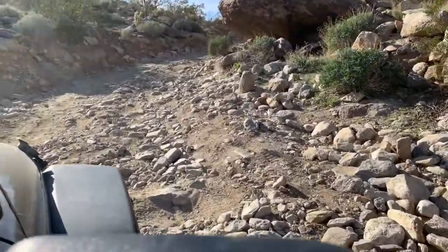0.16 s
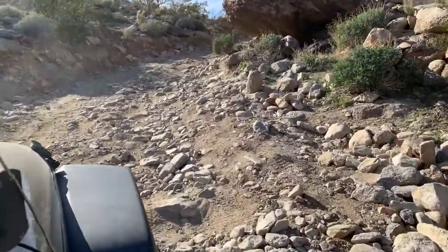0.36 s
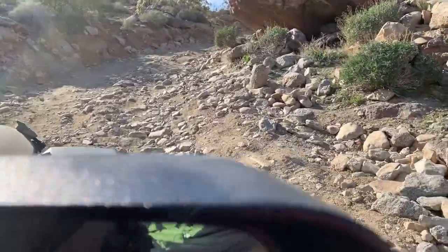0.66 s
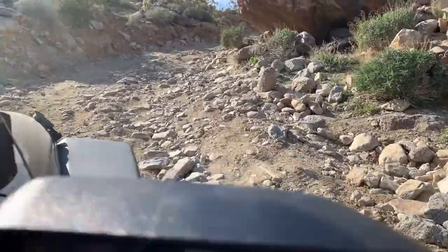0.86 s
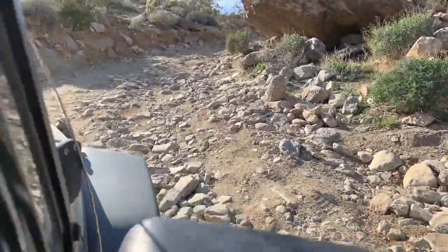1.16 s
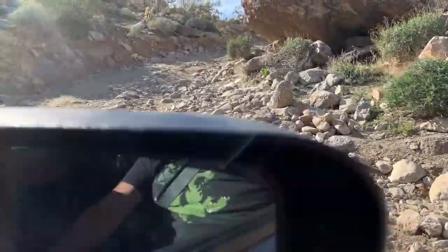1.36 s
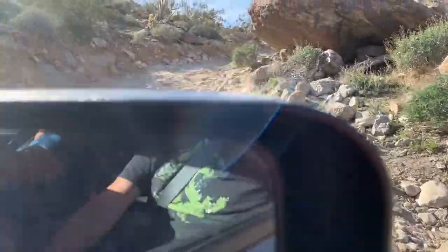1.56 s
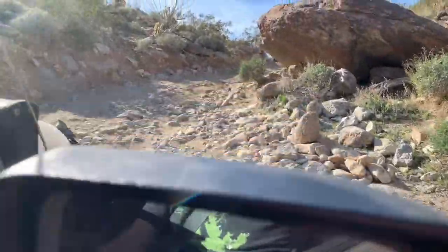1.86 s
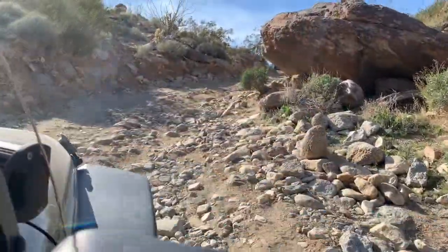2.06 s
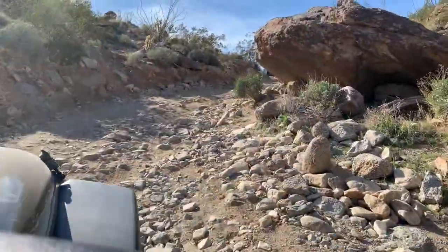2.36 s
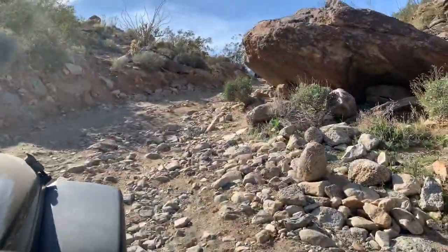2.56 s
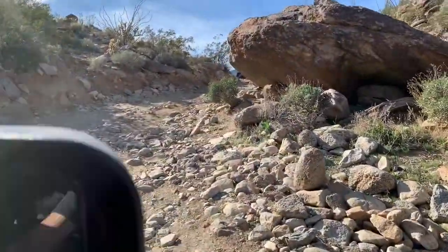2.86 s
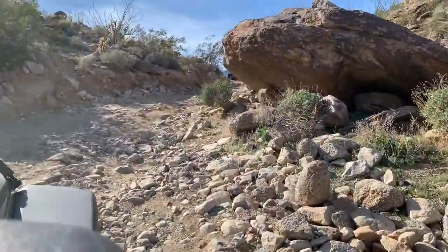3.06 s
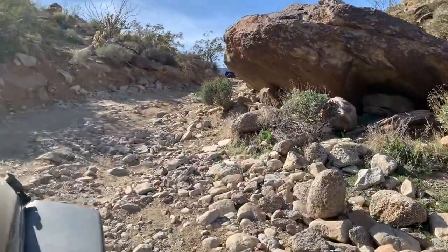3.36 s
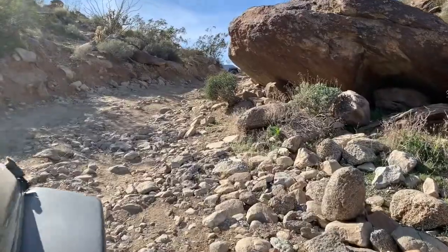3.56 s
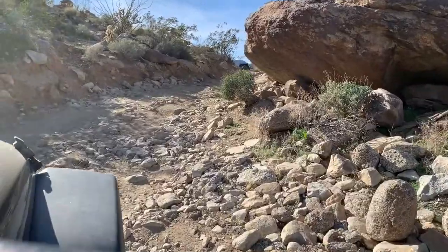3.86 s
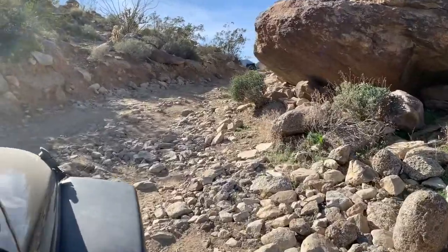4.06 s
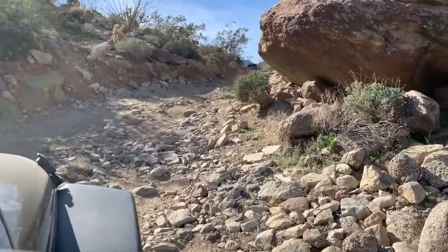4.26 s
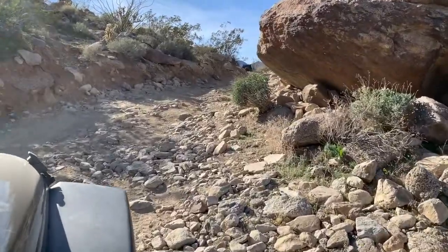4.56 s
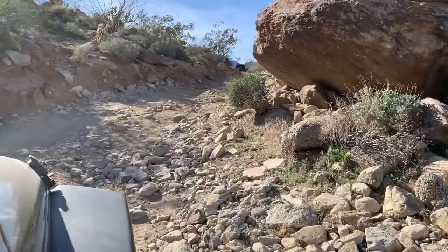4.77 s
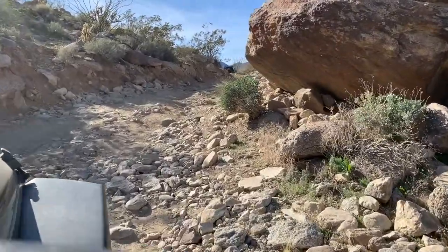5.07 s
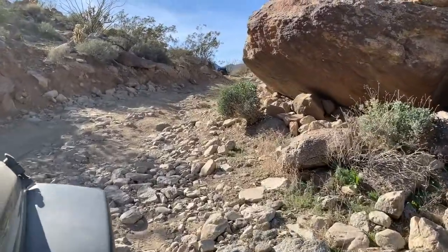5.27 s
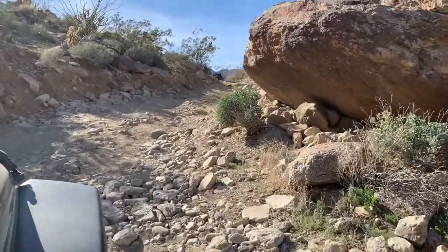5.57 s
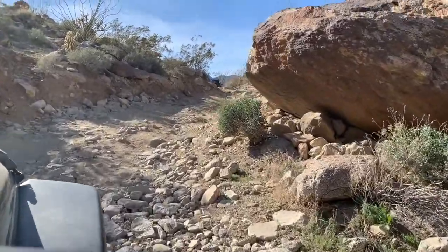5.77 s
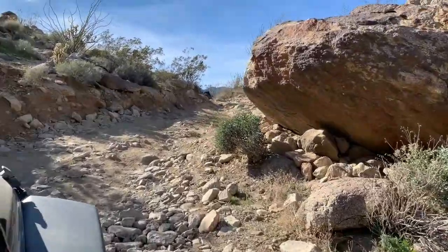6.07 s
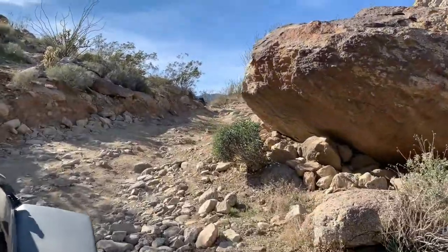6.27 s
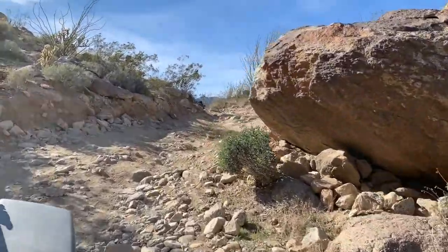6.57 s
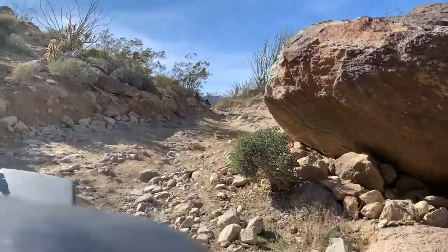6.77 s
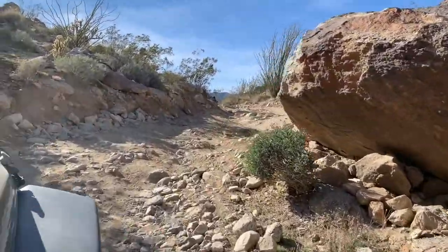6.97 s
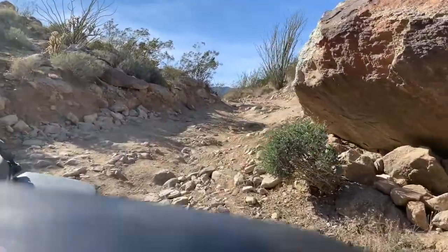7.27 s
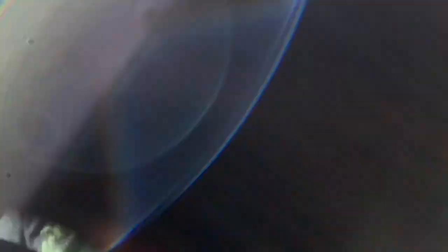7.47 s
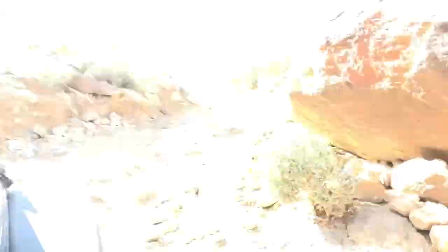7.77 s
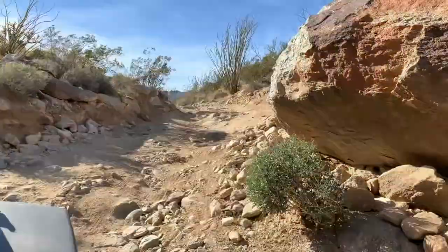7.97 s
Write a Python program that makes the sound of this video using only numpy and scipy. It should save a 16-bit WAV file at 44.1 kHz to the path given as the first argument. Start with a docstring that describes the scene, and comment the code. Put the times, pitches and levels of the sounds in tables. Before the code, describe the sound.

A four-wheel-drive crawls up a rocky trail, engine droning low, gravel crunching and stones knocking, keys jingling, then one hard bang near the end.

```python
"""Rocky trail from an off-road cab

A four-wheel-drive crawls up a rocky desert trail, heard from the cab by the open window.
Tones at multiples of the firing rate drone and sag with the throttle; banded noise makes rumble and tyre roar.
Random pebbles and timed stones ring resonances; jolts thump the cab, trim rubs and cracks, keys jingle.
Near the end a hard bump close to the microphone makes the limiter duck."""
import sys
import numpy as np
from scipy import signal
from scipy.fft import rfft, irfft, next_fast_len
from scipy.io import wavfile
from scipy.ndimage import uniform_filter1d

SR = 44100
rng = np.random.default_rng(int(sys.argv[2]) if len(sys.argv) > 2 else 0)


def to_wav(sig):
    """Store sig (one row per channel, or 1-D mono) as 16-bit WAV at the path in sys.argv[1].

    Samples outside -1..1 are clipped; the rate is SR.
    """
    pcm = np.clip(np.atleast_2d(sig), -1, 1) * 32767
    pcm = np.round(pcm).astype(np.int16)
    wavfile.write(sys.argv[1], SR, pcm.T)  # frames by channels


N = 358522
TIME = np.arange(N) / SR

# wheel-well resonances: (frequency [Hz], level [dB])
WELL_MODES = [(545, -5.5), (690, -3), (810, -7.5), (931, -6), (1130, -10.5), (1450, -1.5), (1700, -5.5),
              (2050, -2), (2840, -19), (3490, -44)]


def from_db(db):
    """Decibels to gain."""
    return 10 ** (np.asarray(db) / 20)


def rms_one(x):
    """Scale to rms 1."""
    return x / np.sqrt(np.mean(x ** 2) + 1e-20)


def peak_one(x):
    """Scale to peak 1."""
    return x / (np.abs(x).max() + 1e-12)


def in_time(rows):
    """Each column of a curve at every sample."""
    time_s, *columns = np.transpose(rows)
    return [np.interp(TIME, time_s, column) for column in columns]


def at_hz(points, hz):
    """Each column of a spectrum at the given frequencies, interpolated over log frequency."""
    known_hz, *columns = np.transpose(points)
    return [np.interp(np.log(hz + 1e-6), np.log(known_hz), column) for column in columns]


def cut(x, hz, kind, order=2):
    """Butterworth filter."""
    sos = signal.butter(order, np.clip(hz, 10, .45 * SR), kind, fs=SR, output="sos")
    return signal.sosfilt(sos, x + 1e-18)


def drift(rate_hz):
    """Slow random wander of spread 1: two-pole low-passed noise, computed every 40 samples."""
    step = 40
    r = np.exp(-2 * np.pi * rate_hz * step / SR)
    noise = rng.standard_normal(N // step + 2002)
    slow = signal.lfilter([1], [1, -2 * r, r * r], noise)[2000:]   # drop the settling
    return np.interp(np.arange(N) / step, np.arange(len(slow)), rms_one(slow))


def ring(force, hz, t60_s):
    """Two-pole resonator: a unit click sets a decaying sine of height 1 ringing."""
    r = from_db(-60 / (t60_s * SR))
    w = 2 * np.pi * hz / SR
    return signal.lfilter([0, np.sin(w)], [1, -2 * r * np.cos(w), r * r], force + 1e-18)


def resonate(x, hz, width_hz):
    """A resonance with gain 1 on top."""
    r = np.exp(-np.pi * width_hz / SR)
    zeros = (1 - r * r) / 2 * np.array([1, 0, -1])
    poles = [1, -2 * r * np.cos(2 * np.pi * hz / SR), r * r]
    return signal.lfilter(zeros, poles, x + 1e-18)


def burst(decay_s):
    """A contact: a dying shower of uneven micro-impacts, a quarter second long."""
    t = TIME[:SR // 4]
    impacts = rng.standard_normal(len(t)) * rng.exponential(1, len(t))
    return impacts * np.exp(-t / max(decay_s, 1e-4))


def add(track, time_s, sound):
    """Mix a sound in at a time."""
    start = max(round(time_s * SR), 0)
    track[start:start + len(sound)] += sound[:N - start]


def ports(shared, diffuse=None):
    """Two microphone ports: phase differs by frequency; diffuse sound also makes their content differ."""
    # microphone ports: (frequency [Hz], likeness [0-1], left lead [rad])
    port_curve = [(49.7, 0.88, 0.71), (356, 0.96, -0.12), (427, 1, 1.25), (596, 1, -1.73), (1170, 0.68, -1),
                  (1600, 0.22, 0), (3470, 0.22, 1.5), (6400, 0.26, 1), (7365, 1, 1.5), (12620, 1, 8),
                  (13900, 0.7, 10), (15800, 0.8, 7)]
    size = next_fast_len(N + SR // 10)
    alike, lead_rad = at_hz(port_curve, np.arange(size // 2 + 1) * SR / size)
    both = rfft(shared, size)
    if diffuse is not None:
        alike = np.clip(alike, 0, 1)
        sides = np.array([[1], [-1]])
        both = np.sqrt((1 + alike) / 2) * both + sides * np.sqrt((1 - alike) / 2) * rfft(diffuse, size)
    lag = np.exp(-1j * lead_rad * np.array([[0], [1]]))   # right port only
    return irfft(both * lag, size)[:, :N]


def from_the_right(x, lag_s=0.000437):
    """Blows on the door side reach the left port later."""
    left, right = x
    return np.array([np.interp(TIME - lag_s, TIME, left), right])


def banded_noise(spectrum, patchy_db, flicker_hz):
    """Half-octave bands of stereo noise that flicker partly together; rms 1."""
    out = 0
    together = drift(flicker_hz)
    edges_hz = 20 * 2 ** np.arange(0, 10.1, .5)
    white = rng.standard_normal((2, 2, N))
    for k, (low, high) in enumerate(zip(edges_hz, edges_hz[1:])):
        if high > spectrum[0][0] and low < spectrum[-1][0]:
            flicker_db = patchy_db * (together + drift(flicker_hz))
            level_db = at_hz(spectrum, np.sqrt(low * high))[0] + flicker_db
            out = out + from_db(level_db) * cut(white[k % 2], [low, high], "band")
    return rms_one(ports(*out))


def climbs():
    """A wheel climbs a rock: the engine labours, the tyre bites; bell-shaped drone and gravel gains in dB."""
    # (middle [s], half length to 1/e [s], drone gain [dB], gravel gain [dB])
    climb_events = [(0.82, 0.27, 0, 2.5), (1.333, 0.044, 4, 1), (2.258, 0.083, 0.5, 2.5),
                    (2.546, 0.079, -1, 2.5), (3.415, 0.15, 8.5, 0), (6.794, 0.092, 5.5, 4.5),
                    (8.054, 0.18, 4, 6.5)]
    gains_db = 0
    for middle_s, half_s, drone_db, gravel_db in climb_events:
        bell = np.exp(-((TIME - middle_s) / half_s) ** 2)
        gains_db = gains_db + np.outer([drone_db, gravel_db], bell)
    return gains_db


def hiss(level_db=-62.0):
    """Steady high band of noise."""
    noise = cut(rng.standard_normal(N), [7000, 15000], "band")
    return from_db(level_db) * ports(rms_one(noise))


def keys(reach_hz=600, tick_s=0.01, t60_s=0.065, rattle_db=-12, rattle_s=0.049, ring_db=2.5, tick_db=5):
    """Each touch is a short rattle that rings a different mix of keys, most strongly near its own pitch."""
    # touches: (time [s], level [dB], brightest pitch [Hz])
    clinks = [(0.071, -47, 11050), (0.577, -44, 11500), (0.785, -37.5, 7482), (0.8, -31.5, 12800),
              (0.819, -37, 9150), (0.945, -31, 7440), (0.948, -30, 11900), (1.223, -36, 12300),
              (1.495, -36.5, 8200), (2.967, -40, 12000), (3.004, -34, 12200), (3.124, -35.5, 12100),
              (3.171, -42, 11000), (3.875, -37, 10000), (3.935, -39, 8150), (4.021, -28.5, 11100),
              (4.2437, -37.5, 11600), (4.295, -36.5, 12600), (4.5516, -32.5, 11800)]
    # key resonances: (frequency [Hz], level [dB])
    key_modes = [(7482, -1), (8999, -7), (10211, -5), (11050, 0), (11917, -5), (12600, -5), (13400, -5),
                 (15738, -8)]
    strength_spread_db, pitch_spread_hz, damping_spread_octaves = 3, 11.5, 0.41
    out = np.zeros(N)
    for time_s, level_db, bright_hz in clinks:
        force = burst(tick_s) + from_db(rattle_db) * burst(rattle_s)
        tone = 0
        for hz, mode_db in key_modes:
            strength = from_db(mode_db + rng.normal(0, strength_spread_db))
            strength = strength / np.hypot(1, (hz - bright_hz) / reach_hz)
            key_hz = hz + rng.normal(0, pitch_spread_hz)
            key_t60_s = t60_s * 2 ** rng.normal(0, damping_spread_octaves)
            tone = tone + strength * peak_one(ring(force, key_hz, key_t60_s))
        tick = peak_one(cut(force, 6400, "high"))
        add(out, time_s, from_db(level_db) * (from_db(ring_db) * peak_one(tone) + from_db(tick_db) * tick))
    return out


def rubs(width_hz=170, muffle_hz=1900):
    """Trim slips as the body twists, in quick showers that ring one hollow resonance."""
    # (time [s], peak [dB], pitch [Hz], decay [s])
    rub_events = [(2.494, -18, 437, 0.0061), (2.512, -19, 377, 0.018), (4.301, -36, 1494, 0.12),
                  (7.346, -12.5, 388, 0.023), (7.351, -16, 675, 0.015), (7.374, -12, 625, 0.006),
                  (7.507, -19, 850, 0.0056), (7.516, -19.5, 627, 0.0057), (7.593, -20.5, 630, 0.012),
                  (7.612, -18, 674, 0.01), (7.63, -28, 693, 0.005), (7.724, -36.5, 2480, 0.017)]
    out = np.zeros(N)
    for time_s, peak_db, hz, decay_s in rub_events:
        slip = cut(burst(decay_s), muffle_hz, "low")
        hollow = resonate(resonate(slip, hz, width_hz), hz, width_hz)
        add(out, time_s, from_db(peak_db) * peak_one(hollow))
    return out


def cracks(crack_hz=4000, trim_ring_db=19.5):
    """Hard contacts give a short bright crack and ring the plastic trim near the microphone."""
    # (time [s], peak [dB], decay [s])
    crack_events = [(3.3747, -23, 0.0019), (3.591, -22, 0.0038), (7.3606, -1, 0.002), (7.372, -14, 0.0064)]
    # trim resonances: (frequency [Hz], width [Hz], level [dB])
    trim_modes = [(1490, 300, 0), (2700, 260, 5), (3680, 300, 7.5), (5500, 600, 1.5)]
    out = np.zeros(N)
    for time_s, peak_db, decay_s in crack_events:
        force = burst(decay_s)
        trim = sum(from_db(db) * resonate(force, hz, width_hz) for hz, width_hz, db in trim_modes)
        crack = cut(force, [400, crack_hz], "band", order=1)
        add(out, time_s, from_db(peak_db) * peak_one(crack + from_db(trim_ring_db) * trim))
    return out


def jolts(bending_s_root_hz=0.1077, mass_hz=220, front_hz=1500):
    """Blows send a bending wave through the cab and ring its panels; low notes lag, so the thump falls."""
    # blows through suspension and cab: (time [s], peak [dB], contact softness as cut-off [Hz])
    jolt_events = [(.347, -20, 258), (0.388, -18.5, 350), (0.41, -16, 220), (0.493, -17, 145),
                   (2.513, -14, 400), (7.3607, 9.5, 850), (7.694, -8.5, 86), (7.728, -11.5, 115)]
    # cab panels: (frequency [Hz], width [Hz], level [dB])
    cab_modes = [(63, 9, 0), (109, 33, 1.5), (210, 65, -6), (370, 32, -5), (680, 75, -2), (1000, 140, 9.5)]
    out, size = np.zeros(N), SR // 4
    wave = cut(signal.unit_impulse(size), mass_hz, "low", order=1)
    panels = wave + sum(from_db(db) * resonate(wave, hz, width_hz) for hz, width_hz, db in cab_modes)
    hz = np.maximum(np.arange(size // 2 + 1) * SR / size, 20)
    delay_s = bending_s_root_hz * np.maximum(hz ** -.5 - front_hz ** -.5, 0)
    phase_rad = 2 * np.pi * np.cumsum(delay_s) * SR / size   # integral of group delay
    thump = irfft(rfft(panels) * np.exp(-1j * phase_rad), size)
    fade = np.hanning(2 * size)[size:]
    for time_s, peak_db, soft_hz in jolt_events:
        add(out, time_s, from_db(peak_db) * peak_one(fade * cut(thump, [55, soft_hz], "band")))
    return out


def scrapes(edge_ratio=1.1):
    """A small stone snaps or skids on rock: a shower of micro-impacts in a broad band around its pitch."""
    # (time [s], level [dB], pitch [Hz], decay [s])
    scrape_events = [(0.808, -27, 2240, 0.0098), (0.943, -27.5, 2420, 0.0032), (1.837, -32, 3570, 0.033),
                     (2.51, -25, 2440, 0.009), (2.623, -31.5, 2240, 0.023), (2.914, -29, 1550, 0.0017),
                     (2.962, -34, 5000, 0.011), (3.374, -24, 2550, 0.003), (3.769, -22.5, 1500, 0.0024),
                     (3.871, -33, 4840, 0.019), (4.236, -34, 1300, 0.003), (4.238, -28.5, 2090, 0.007),
                     (4.274, -34, 2240, 0.02), (6.377, -32, 1420, 0.0022), (7.352, -20, 2820, 0.012),
                     (8.013, -31.5, 1380, 0.0033)]
    out = np.zeros(N)
    for time_s, level_db, hz, decay_s in scrape_events:
        shower = cut(burst(decay_s), [hz / edge_ratio, hz * edge_ratio], "band", order=1)
        add(out, time_s, from_db(level_db) * peak_one(cut(shower, 2 * hz, "low")))
    return out


def stones(knock_db=4.0, chip_db=-1.0, chip_hz=2400, tail_db=-24, tail_s=0.11, crumble_s=0.0036,
           reach_octaves=0.59, well_t60_s=0.032):
    """A stone shifts under a tyre: a crumbling knock in the wheel well and a bright chip of rock on rock."""
    # larger stones: (time [s], level [dB], relative treble [dB], pitch [Hz])
    stone_events = [(0.077, -27, -32, 706), (0.107, -31.5, -22, 706), (0.242, -33.5, -23, 1000),
                    (0.295, -30, -22, 890), (0.809, -26, -3, 690), (0.905, -28.5, -24, 745),
                    (1.312, -25.5, -6, 670), (1.763, -26.5, -21, 820), (2.083, -26, -11, 891),
                    (2.136, -29.5, -21, 830), (2.513, -22, -25, 930), (2.994, -26, -1, 675),
                    (3.374, -28.5, 5, 600), (3.485, -30.5, -9, 651), (3.592, -18.5, 1.5, 760),
                    (5.834, -34, -16, 730), (6.38, -29, -35, 1040)]
    out = np.zeros(N)
    for time_s, level_db, treble_db, pitch_hz in stone_events:
        force = burst(crumble_s) + from_db(tail_db) * burst(tail_s)
        snap = force + 6 * signal.unit_impulse(len(force))   # the stone lets go all at once
        knock = 0
        for hz, mode_db in WELL_MODES:
            nearness = 1 / (1 + (np.log2(hz / pitch_hz) / reach_octaves) ** 2)   # its size picks the modes
            gain = from_db(mode_db) * nearness * rng.choice([-1, 1])
            knock = knock + gain * ring(snap, hz, well_t60_s)
        chip = cut(cut(force, chip_hz, "high"), 13000, "low", order=1)
        blow = from_db(knock_db) * peak_one(knock) + from_db(chip_db + treble_db) * peak_one(chip)
        add(out, time_s, from_db(level_db) * blow)
    return out


def body_rumble(level_db):
    """Low banded noise as the body sways and shakes."""
    # (frequency [Hz], density [dB per Hz])
    rumble_spectrum = [(22, -18), (35, -4), (48, -2), (75, 4), (100, -10), (150, -12), (220, -12),
                       (400, -40)]
    return from_db(level_db) * banded_noise(rumble_spectrum, patchy_db=0.5, flicker_hz=4.7)


def tyre_roll(level_db):
    """Tyre roar: flickering low and middle noise bands."""
    # (frequency [Hz], density [dB per Hz])
    roll_spectrum = [(80, 5.5), (150, -6), (260, -3.5), (350, 2.5), (440, -6.5), (570, -12.5), (720, -7.5),
                     (950, -15), (1400, -15.5), (3000, -58)]
    return from_db(level_db) * banded_noise(roll_spectrum, patchy_db=1.0, flicker_hz=13.5)


def wheel_well(x, direct=1.0, width_hz=80, shift_db=4.5):
    """Noise comes partly direct, partly through well modes; shifting stones favour one, then another."""
    out = direct * x
    for hz, mode_db in WELL_MODES:
        out = out + from_db(mode_db + shift_db * drift(10.0)) * resonate(x, hz, width_hz)
    return rms_one(out)


def gravel_crunch(level_db):
    """Gravel under the tyres: flickering noise bands coloured by the wheel well."""
    # (frequency [Hz], density [dB per Hz])
    gravel_spectrum = [(500, -9.5), (950, 2), (1500, -0.5), (2200, -2.5), (3300, -4.5), (5000, -7),
                       (7000, -12), (11000, -17), (16000, -20)]
    crunch = banded_noise(gravel_spectrum, patchy_db=1.71, flicker_hz=14.7)
    return from_db(level_db) * wheel_well(crunch)


def pebbles(median_per_s=170, ring_cycles=18, spread_db=3.6):
    """Pebbles snap in random clumps, each ringing at its own pitch; the big, low ones are loudest."""
    sizes = from_db(spread_db * np.minimum(rng.exponential(1, N), 4)) * rng.choice([-1, 1], N)
    born = rng.random(N) < median_per_s * from_db(6 * drift(9)) / SR
    pitches_hz, dealt = np.geomspace(620, 4500, 20), rng.integers(0, 20, N)
    out = 0
    for k, hz in enumerate(pitches_hz):
        snaps = sizes * born * (dealt == k)
        out = out + ring(snaps, hz, ring_cycles / hz) * (hz / 1000) ** -.4
    return rms_one(out)


def engine(firing_hz, labour_db, overtones_db=-32, uneven_db=3):
    """Exhaust tones: the firing tone booms in the cab, the others waver as the cylinders fire unevenly."""
    # boom at one firing rate, dead spot just below: (firing rate [Hz], firing tone level [dB])
    cab_boom = [(48, -30.5), (55, -32), (59.5, -37), (62.5, -33), (65.5, -27.5), (71, -29), (80, -26)]
    # exhaust tones: (multiple of firing rate [1], relative level [dB])
    tones = [(1, 0), (1.5, -9), (2, -10), (2.5, -16), (3, -19.5), (4, -24), (4.5, -23), (5, -20),
             (5.5, -24), (6, -23)]
    boom_db = at_hz(cab_boom, firing_hz)[0] + labour_db
    crank = np.cumsum(firing_hz * (1 + 0.006 * drift(15.4))) / SR   # firing cycles
    out = 0
    for multiple, level_db in tones:
        drone_db = boom_db if multiple == 1 else overtones_db + uneven_db * drift(6.3)
        tone = np.sin(2 * np.pi * (multiple * crank + rng.random()))
        out = out + from_db(drone_db + level_db) * tone
    return ports(np.sqrt(2) * out)   # tone levels are rms


def scene():
    """Engine, rolling tyres and everything that the trail shakes."""
    # body sways over the ruts: (time [s], rumble level before a 10.5 dB lift [dB])
    sway = [(0, -39.5), (.9, -39.5), (2.1, -42), (2.85, -46), (3.25, -43), (4.4, -47.5), (5.9, -45),
            (6.5, -42.5), (7.2, -47.5), (8.13, -41)]
    # looseness of the trail: (time [s], gravel crunch [dB])
    trail = [(0.0, -50), (0.6, -49.5), (0.88, -46.5), (1.26, -45.5), (2.07, -47), (2.45, -43.5),
             (3.1, -50.5), (3.92, -46.5), (4.36, -47.5), (4.66, -48), (6.84, -47.5), (7.22, -50.5)]
    # engine speed: (time [s], firing rate [Hz])
    speed = [(0.0, 55.8), (0.32, 58.53), (0.72, 69.84), (1.09, 73.47), (1.79, 57.9), (2.08, 52.1),
             (2.31, 72.3), (2.47, 80.27), (2.67, 71.2), (2.92, 52.26), (3.13, 47.37), (3.49, 60.2),
             (3.98, 68.38), (4.35, 58.6), (4.71, 64.15), (6.18, 70.2), (6.38, 67.3), (6.88, 65.8),
             (7.06, 55.5), (7.4, 53), (8.13, 67)]
    sway_follows, roll_follows = 0.26, 0.5   # shares of the climb's drone gain and of the gravel's swing
    door_shade_db, pebbles_db = 5, -4.5   # crack loss at the left port; pebbles against gravel
    firing_hz, = in_time(speed)
    labour_db, bite_db = climbs()
    rumble_db = in_time(sway)[0] + sway_follows * labour_db + 10.5
    gravel_db = in_time(trail)[0] + bite_db
    roll_db = -38.5 + roll_follows * (gravel_db - gravel_db.mean())
    cab = ports(rubs() + keys())
    door = from_the_right(jolts() + cracks() * from_db([[-door_shade_db], [0]]))
    rocks = ports(stones() + scrapes(), stones() + scrapes())
    ground = body_rumble(rumble_db) + tyre_roll(roll_db) + gravel_crunch(gravel_db)
    snaps = from_db(gravel_db + pebbles_db) * ports(pebbles(), pebbles())
    return hiss() + cab + door + rocks + ground + snaps + engine(firing_hz, labour_db)


def record(dry, ceiling_db=0.0, release_db_per_s=44, cutoff_hz=16000):
    """A limiter ducks at once on overload and recovers slowly; the top is cut."""
    level_db = 20 * np.log10(np.abs(dry).max(axis=0) + 1e-9)
    over_db = np.maximum(level_db - ceiling_db, 0)
    recovery_db = release_db_per_s * TIME
    duck_db = np.maximum.accumulate(over_db + recovery_db) - recovery_db
    limited = dry * from_db(-uniform_filter1d(duck_db, size=64))
    return signal.sosfilt(signal.ellip(10, .1, 80, cutoff_hz, fs=SR, output="sos"), limited)


dry = scene()
out = record(dry)
to_wav(out)
```